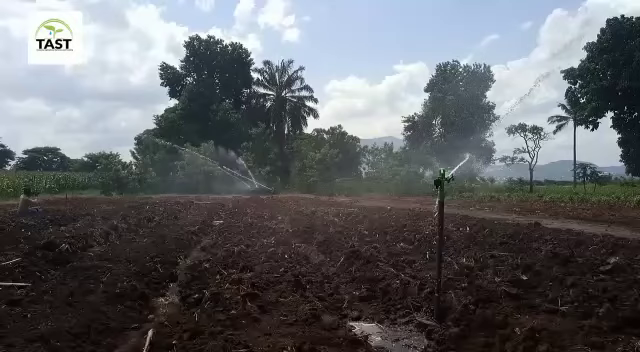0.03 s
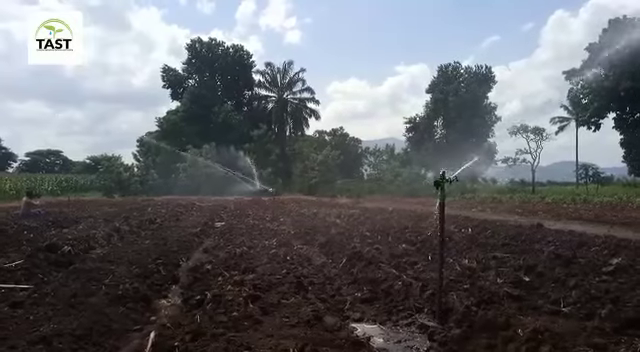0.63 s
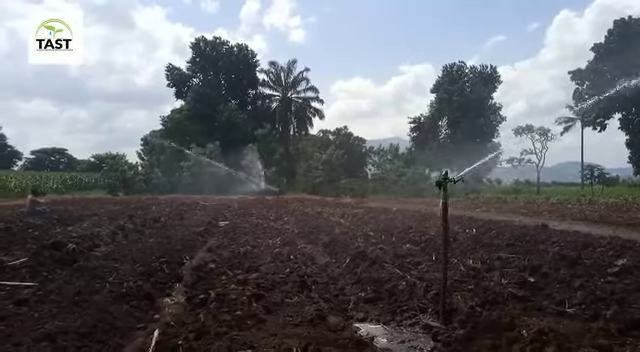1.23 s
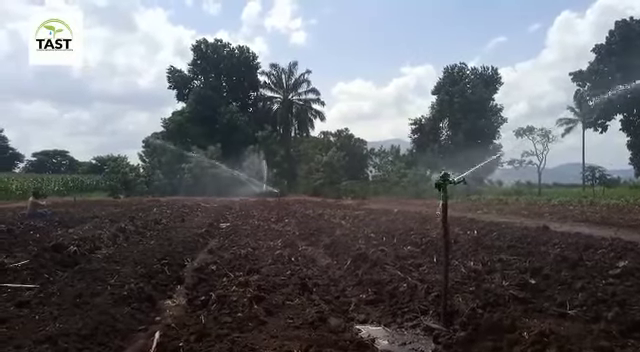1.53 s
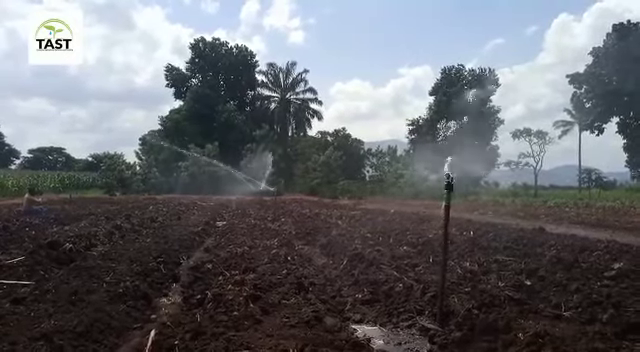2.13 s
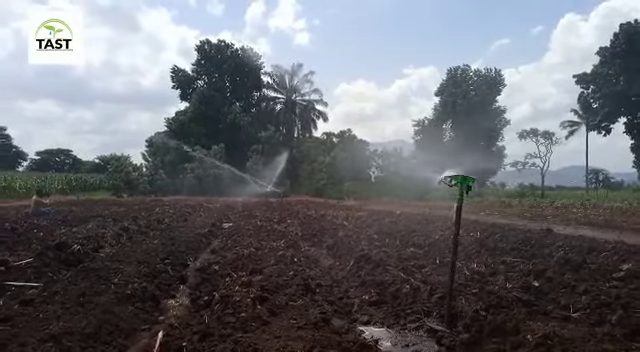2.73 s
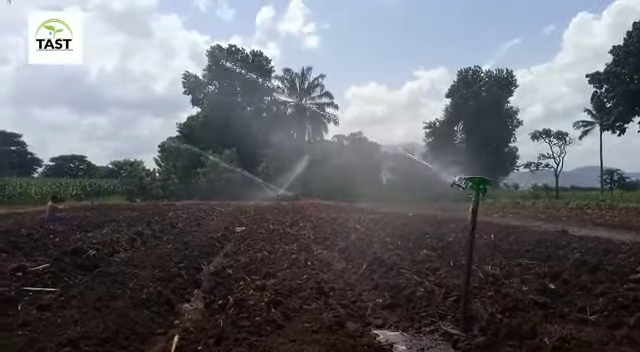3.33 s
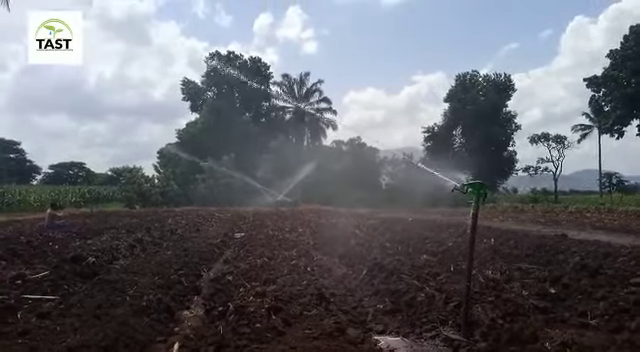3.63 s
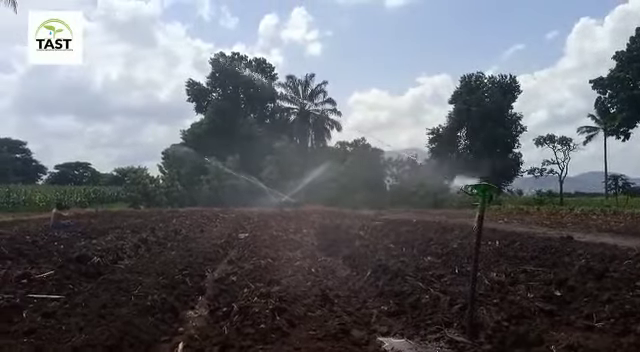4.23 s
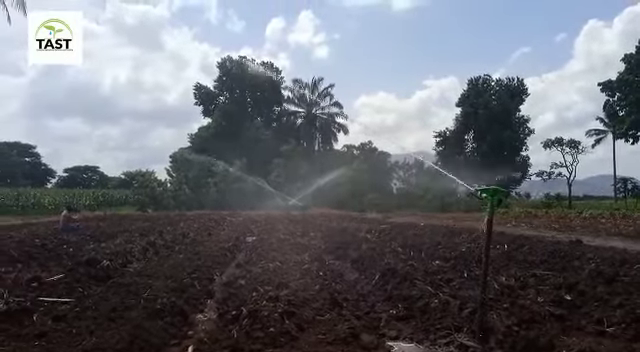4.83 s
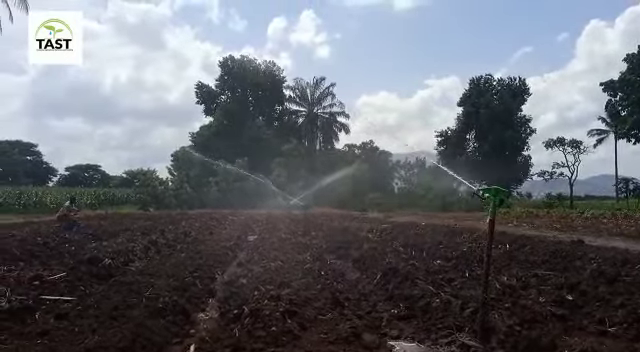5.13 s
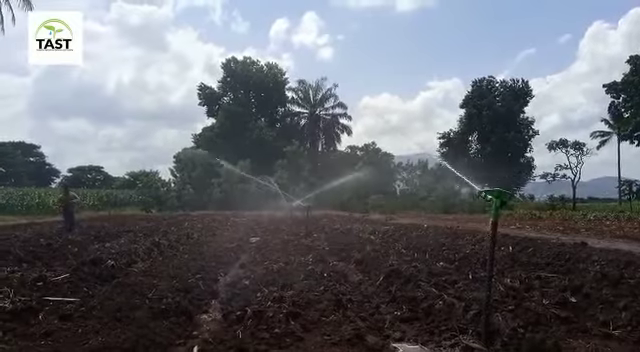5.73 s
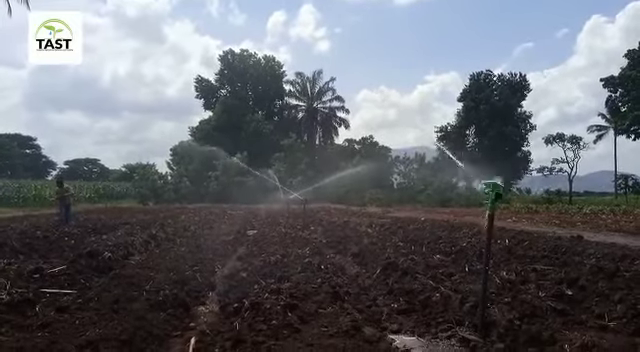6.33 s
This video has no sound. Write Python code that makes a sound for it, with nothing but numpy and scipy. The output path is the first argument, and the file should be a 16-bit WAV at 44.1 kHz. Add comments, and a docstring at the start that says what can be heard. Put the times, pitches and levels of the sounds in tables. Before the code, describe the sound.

An impact sprinkler chops out quick wet bursts of spray, rattles rapidly in reverse, then resumes its even chopping over hissing water.

```python
"""Wet chops of spray, about ten a second, swell in: an impact sprinkler in a ploughed field, a few metres
away, its sprung arm slapping into the jet. It trips into reverse and rattles back, the arm knocking
on its stop about 24 times a second and ringing the plastic head, then steps forward again.
The jet hisses, stray water splashes and ticks, and the soil scatters a short echo.
A far pump drones under a faint wind."""
import sys
import numpy as np
from scipy import signal
from scipy.fft import rfft, irfft, next_fast_len
from scipy.io import wavfile
from scipy.ndimage import uniform_filter1d

SR = 44100
rng = np.random.default_rng(int(sys.argv[2]) if len(sys.argv) > 2 else 0)


def put_to_file(sound):
    """Save the sound as 16-bit audio at rate SR, in the file named by the first command-line argument."""
    columns = np.atleast_2d(sound).T  # one column per channel
    safe = np.clip(columns, -1, 1)
    whole_steps = np.round(safe * 32767)
    wavfile.write(sys.argv[1], SR, whole_steps.astype(np.int16))


N = 285327

# runs of even swings: first beat/s, last beat/s, count, first lag/s
SWING_RUNS = [(.154, 1.207, 12, 0), (1.299, 1.671, 5, -.005), (3.2495, 5.39, 23, .0175),
              (5.466, 6.432, 11, -.003)]
def swing_times(settle_swings=1.9):
    """The sprung arm beats evenly; after an upset it falls back into step within a few swings."""
    return np.concatenate([np.linspace(first, last, count) + lag * np.exp(-np.arange(count) / settle_swings)
                           for first, last, count, lag in SWING_RUNS])


# scattered spray: f/Hz, density/dB
SPRAY_SPECTRUM = [(300, -18.5), (700, -9), (1300, -12.5), (1900, -14.5), (2500, -8), (3300, -5.5),
                  (4050, -4.5), (4900, 1.5), (6500, 3), (7300, -4.5), (8800, -0.5), (11000, -6),
                  (16000, -6.5)]
# spoon hitting water: f/Hz, density/dB
SLAP_SPECTRUM = [(200, -33.5), (450, -6), (620, 3.5), (800, 5.5), (1000, -20), (1250, 4), (1900, -14.5),
                 (3300, -1), (6000, -30.5)]
# swing force: t/s, relative spray level/dB, relative slap level/dB
SWING_FORCE = [(.155, -52.5, -70), (.25, -41.5, -62), (.44, -37, -54), (.75, -35.5, -53), (1.4, -38, -53),
               (3.3, -36, -53.5), (4.3, -37, -50), (5.5, -36.5, -52), (6.43, -37, -57.5)]
def forward_swings(thud_db, thud_delay_s, spray_delay_s, churn_db, spray_trim_db=-1):
    """The arm's spoon thuds into the jet, churns and scatters it; the hollow head rings along."""
    spray_vary_db, slap_vary_db = 0.55, 1.16
    hollow_hz, hollow_width_hz, hollow_db = 3320, 240, -16
    times = swing_times()
    wet_times = times + spray_delay_s
    vary_db = rng.standard_normal((len(times), 2)) * [spray_vary_db, slap_vary_db]
    spray_db, slap_db = at_times(SWING_FORCE, times) + vary_db.T
    spray = water(SPRAY_SPECTRUM, drops_per_s=4000, drop_share=0.65, size_db=5, flutter_db=2)
    spray *= bursts(wet_times, spray_db + spray_trim_db, attack_s=0.002, hold_s=0.01, release_s=0.0035)
    churn = bursts(wet_times, slap_db + churn_db, attack_s=0.0012, hold_s=0.014, release_s=0.012)
    slap = churn * noise(SLAP_SPECTRUM)
    thud = colour(signal.unit_impulse(1024), SLAP_SPECTRUM)
    for at, db in zip(times, slap_db):
        add(slap, at + thud_delay_s, from_db(db + thud_db) * thud / np.abs(thud).max())
    hollow = signal.lfilter(*signal.iirpeak(hollow_hz, hollow_hz / hollow_width_hz, fs=SR), spray + slap)
    return spray + slap + from_db(hollow_db) * np.std(spray) * rms_one(hollow)


# return pace, even between rows: knock number, t/s
RETURN_PACE = [(0, 1.7206), (1, 1.7735), (2, 1.817), (11, 2.1815), (16, 2.391), (31, 3.022), (34, 3.151)]
# return force: t/s, relative knock level/dB, ring f/Hz, brightness/dB, spray level/dB
RETURN_FORCE = [(1.72, -25.5, 3270, -3, -47), (1.77, -24, 3400, -3, -59), (1.82, -28.5, 3560, -5, -38),
                (2.18, -26.5, 3500, -12, -39.2), (2.4, -24, 3420, -12, -40),
                (2.75, -21.5, 3440, -16, -37.5), (3.06, -20, 3670, -4.5, -36), (3.15, -24.5, 3500, 4, -38)]
# plastic arm and head modes: f/ring f, level/dB, t60/s, share of brightness
HEAD_MODES = [(.9, -20, .011, 0), (.99, -2, .007, 0), (1.14, -8, .005, .2), (1.44, -2, .0035, 1),
              (1.66, -5, .003, 1), (1.88, -5, .003, 1), (2.6, -9, .002, 1), (4.35, -11, .002, 1)]
# a small part radiates little below its first mode: f/Hz, gain/dB
RADIATION = [(1500, -22), (2500, -18), (2750, -10), (3050, 0), (16000, 0)]
def return_run(vary_db, limp_s=0.001, limp_db=0.9, limp_hz=25, spray_lead_s=0.014):
    """On a short stroke the arm cuts the jet, then hits the stop, which rings the head."""
    number = np.arange(RETURN_PACE[-1][0] + 1)
    limp = (-1) ** number  # every other knock is later, harder and higher
    times = at_times(RETURN_PACE, number)[0] + limp_s * limp
    knock_db, ring_hz, bright_db, spray_db = at_times(RETURN_FORCE, times)
    knock_db += limp_db * limp
    ring_hz += limp_hz * limp
    spray = water(SPRAY_SPECTRUM, drops_per_s=2500, drop_share=0.36, size_db=4.5, flutter_db=2.5)
    spray *= bursts(times - spray_lead_s, spray_db, attack_s=0.0032, hold_s=0.0094, release_s=0.0027)
    knocks = np.zeros(N)
    for at, db, hz, bright in zip(times, knock_db, ring_hz, bright_db):
        for ratio, mode_db, t60_s, share in HEAD_MODES:
            level_db = db + mode_db + share * bright + vary_db * rng.standard_normal()
            add(knocks, at, from_db(level_db) * ring(ratio * hz, t60_s))
    return colour(knocks, RADIATION) + spray


# loudest stray ticks: t/s, peak before trim/dB, f/Hz, t60/s
LOUD_TICKS = [(.7329, -17.5, 8300, .0025), (1.3701, -18.5, 6860, 0.0061), (1.396, -21, 4970, .005),
              (1.4202, -17.5, 6660, 0.005), (1.4906, -22.5, 5700, .0068), (1.523, -19.5, 5250, 0.007),
              (1.5605, -17.5, 5000, 0.0056), (1.5795, -18.5, 6700, 0.0026), (1.617, -22, 6230, 0.0034),
              (1.644, -20.5, 6700, .005), (1.8445, -24, 5030, .007), (2.2064, -20, 5870, 0.0043),
              (2.87, -18, 5240, 0.0058), (2.927, -18, 6500, 0.0085), (3.1783, -22, 5730, 0.0041),
              (3.9186, -19.5, 6100, .014), (4.0086, -24, 6600, .0079), (4.3998, -20.5, 6030, 0.0037),
              (6.0038, -16, 6400, 0.018), (6.0918, -21, 6540, .0048)]
def ticks(lesser_rows, crack_db, crack_t60_s, trim_db=-1):
    """Each tick, loud or lesser, is a tiny crack and a brief ring."""
    out = np.zeros(N)
    for at, db, hz, t60_s in list(LOUD_TICKS) + lesser_rows:
        tone = ring(hz, t60_s)
        t = np.arange(len(tone)) / SR
        crack = noise(SPRAY_SPECTRUM, len(t)) * from_db(-60 * t / crack_t60_s)
        tick = tone + from_db(crack_db) * crack
        add(out, at, from_db(db + trim_db) * tick / np.abs(tick).max())
    return out


def lesser_ticks(times, levels_db, centre_hz=5950, spread_octaves=0.23, t60_s=0.0063):
    """Tick rows with one decay time and scattered pitches."""
    pitches_hz = centre_hz * 2 ** (spread_octaves * rng.standard_normal(len(times)))
    return [(at, db, hz, t60_s) for at, db, hz in zip(times, levels_db, pitches_hz)]


# arm ticks, strongest early on: t/s, relative peak/dB
ARM_TICK_LEVEL = [(.155, -51), (.25, -27), (.54, -20), (.75, -23), (1.02, -24.5), (1.2, -28), (3.3, -39)]
def arm_ticks(delay_s=0.004):
    """The arm ticks as it swings in; returns tick rows."""
    times = swing_times()
    return lesser_ticks(times + delay_s, at_times(ARM_TICK_LEVEL, times)[0])


def stray_drops(count, start_s=0.462, over_jet_db=14, vary_db=1):
    """Drops land at random, their level following the jet; returns tick rows."""
    times = rng.uniform(start_s, N / SR, count)
    levels_db = at_times(JET_LEVEL, times)[0] + over_jet_db + vary_db * rng.standard_normal(count)
    return lesser_ticks(times, levels_db)


# stray gushes: t/s, length/s, level before trim/dB
SPLASHES = [(1.063, 0.029, -46.5), (1.137, 0.0083, -46.5), (1.307, 0.019, -36), (1.359, .023, -36.5),
            (1.51, 0.012, -38.5), (1.562, 0.016, -37.5), (1.77, 0.0108, -35.5), (2.204, .0092, -38),
            (2.868, 0.0075, -32.5), (3.173, .016, -39.5), (3.958, 0.028, -45.5), (4.396, 0.0065, -48),
            (6, 0.016, -56)]
def splashes(edge_s, splat_db, trim_db=1):
    """Coarse gushes thrown off the sprinkler, each with a dull splat under it."""
    gate = np.zeros(N)
    for at, length_s, db in SPLASHES:
        add(gate, at, np.full(round(length_s * SR), from_db(db + trim_db)))
    gate = uniform_filter1d(gate, round(edge_s * SR))
    splat = from_db(splat_db) * noise(SLAP_SPECTRUM)
    gush = water(HISS_SPECTRUM, drops_per_s=2500, drop_share=0.58, size_db=9, flutter_db=2.5)
    return gate * (gush + splat)


# hiss of jet and gushes: f/Hz, density/dB
HISS_SPECTRUM = [(400, -9.5), (1200, -9.5), (2300, -7.5), (3300, 2), (3900, -4), (4900, 3), (6500, 4.5),
                 (7300, -4.5), (8900, 0.5), (11000, -7), (16000, -4.5)]
# unbroken jet: t/s, level before trim/dB
JET_LEVEL = [(.4, -53.5), (1.05, -49.5), (1.48, -47.5), (1.62, -40), (1.73, -49.5), (1.85, -43),
             (2.1, -48.5), (2.3, -42.5), (2.6, -47), (3.13, -45.5), (3.23, -52), (5.9, -53), (6.06, -48.5),
             (6.25, -53.5)]
def jet(trim_db=-0.5, waver_db=1):
    """The free jet hisses and its drops patter on the soil."""
    hiss = water(HISS_SPECTRUM, drops_per_s=900, drop_share=0.27, size_db=6, flutter_db=2)
    level_db = at_times(JET_LEVEL, np.arange(N) / SR)[0]
    return from_db(level_db + trim_db + waver_db * drift(21)) * hiss


# wind rumble: f/Hz, density/dB
WIND_SPECTRUM = [(15, -48), (35, -14), (70, -2.5), (130, 1.5), (200, -6), (300, -13.5), (700, -16.5),
                 (1000, -18.5), (2000, -23.5), (5000, -39)]
def wind(level_db, gust_db):
    """Faint wind rumbles in soft gusts."""
    return from_db(level_db + gust_db * drift(3.8)) * noise(WIND_SPECTRUM)


# pump lines: f/Hz, rms before trim/dB, waver/Hz
PUMP_LINES = [(50.3, -66, 0.33), (52.2, -60.5, 0.47), (100.4, -59.5, 0.76), (117.6, -61.5, 2.58),
              (142, -66.5, 2.98)]
def pump(trim_db=-2.5, waver_db=1.8):
    """A far pump drones in low lines that waver in pitch and level."""
    out = np.zeros(N)
    for hz, db, waver_hz in PUMP_LINES:
        phase = 2 * np.pi * np.cumsum(hz + waver_hz * drift(3)) / SR
        out += np.sqrt(2) * from_db(db + trim_db + waver_db * drift(2.7)) * np.sin(phase)
    return out


def diffuse_echo(x, level_db, t60_s, delay_s):
    """A short diffuse echo: a scatter of fine reflections that dies away quickly."""
    t = np.arange(SR // 10) / SR
    echo = rng.standard_normal(len(t)) * from_db(-60 * t / t60_s) * (t > delay_s)
    return from_db(level_db) * signal.fftconvolve(x, echo / np.linalg.norm(echo))[:N]


def water(spectrum, drops_per_s, drop_share, size_db, flutter_db, patchy_db=1.5):
    """Water tearing apart: fine mist plus droplets of uneven size; rms 1."""
    sizes = from_db(size_db * np.minimum(rng.exponential(1, N), 3)) * rng.choice([-1, 1], N)
    droplets = rms_one(sizes * (rng.random(N) < drops_per_s / SR))
    spray = np.sqrt(drop_share) * droplets + np.sqrt(1 - drop_share) * rng.standard_normal(N)
    # the mix of drop sizes keeps changing, so the bands swell and sink separately
    edges_hz = np.geomspace(2000, 16000, 8)
    out = spray.copy()
    for low, high in zip(edges_hz, edges_hz[1:]):
        band = signal.sosfilt(signal.butter(1, [low, high], "band", fs=SR, output="sos"), spray)
        out += band * (from_db(patchy_db * drift(115)) - 1)
    return rms_one(colour(out * from_db(flutter_db * drift(170)), spectrum))


def bursts(times, levels_db, attack_s, hold_s, release_s, mist_db=-13, mist_s=0.016):
    """Envelope of spray bursts: swell, hold, then a release with mist hanging on."""
    lead_s, mist = 0.03, from_db(mist_db)
    t = np.arange(-lead_s, 2 * lead_s, 1 / SR)
    after_s = np.maximum(t - hold_s, 0)
    swell = np.exp(np.minimum(t, 0) / attack_s)
    release = (1 - mist) * np.exp(-after_s / release_s) + mist * np.exp(-after_s / mist_s)
    out = np.zeros(N)
    for at, db in zip(times, levels_db):
        add(out, at - lead_s, from_db(db) * swell * release)
    return out


def ring(hz, t60_s):
    """A struck mode, 30 ms long."""
    t = np.arange(round(0.03 * SR)) / SR
    return np.sin(2 * np.pi * hz * t) * from_db(-60 * t / t60_s)


def drift(rate_hz):
    """Smooth random curve, rms 1, changing at about rate_hz."""
    hop, warm_up = 40, 2000
    pole = np.exp(-2 * np.pi * hop * rate_hz / SR)
    white = rng.standard_normal(N // hop + warm_up + 2)
    slow = signal.lfilter([1], [1, -2 * pole, pole * pole], white)[warm_up:]
    return np.interp(np.arange(N) / hop, np.arange(len(slow)), rms_one(slow))


def colour(x, spectrum):
    """Minimum-phase filter from rows of f/Hz, gain/dB."""
    size = 2 * next_fast_len(len(x))
    hz, db = np.transpose(spectrum)
    bins_hz = np.arange(size // 2 + 1) * SR / size
    log_gain = np.log(from_db(np.interp(np.log(bins_hz + 1), np.log(hz), db)))
    cepstrum = irfft(log_gain)[:size // 2]
    cepstrum[1:] *= 2
    return irfft(rfft(x, size) * np.exp(rfft(cepstrum, size)))[:len(x)]


def noise(spectrum, samples=N):
    """Coloured noise, rms 1."""
    return rms_one(colour(rng.standard_normal(samples), spectrum))


def high_pass(x, hz, order):
    return signal.sosfilt(signal.butter(order, hz, "high", fs=SR, output="sos"), x)


def at_times(rows, times):
    """Interpolate each later column along the first."""
    knots, *columns = np.transpose(rows)
    return [np.interp(times, knots, column) for column in columns]


def add(out, at_s, sound):
    """Mix a short sound in."""
    start = max(round(at_s * SR), 0)
    part = out[start:start + len(sound)]
    part += sound[:len(part)]


def from_db(db):
    return 10 ** (np.asarray(db) / 20)


def rms_one(x):
    return x / np.sqrt(np.mean(x ** 2) + 1e-20)


def scene():
    """The sprinkler over jet, wind and pump, which fade in; mono but for the treble of the gushes."""
    fade_start_s, fade_s, fade_power = 0.132, 0.33, 0.81
    gushes = splashes(edge_s=0.0011, splat_db=-23)
    ticking = ticks(arm_ticks() + stray_drops(count=50), crack_db=-7.5, crack_t60_s=0.0058)
    ticking = high_pass(ticking, hz=3160, order=2)
    chops = forward_swings(thud_db=13, thud_delay_s=0.003, spray_delay_s=0.00074, churn_db=-8)
    sprinkler = chops + return_run(vary_db=2) + ticking + gushes
    fade = np.clip((np.arange(N) / SR - fade_start_s) / fade_s, 0, 1) ** fade_power
    background = fade * (jet() + wind(level_db=-54, gust_db=1.2) + pump())
    mid = sprinkler + diffuse_echo(sprinkler, level_db=-9.5, t60_s=0.038, delay_s=0.0018) + background
    gush_echo = diffuse_echo(gushes, level_db=-12, t60_s=0.006, delay_s=0.0005)
    side = high_pass(gush_echo, hz=5300, order=12)
    return np.array([mid + side, mid - side])


# microphone response, a dip and a peak in the top octave: f/Hz, gain/dB
MICROPHONE = [(10000, 0.5), (12700, 1), (13700, -4), (14200, -2.5), (14700, 7.5), (15700, 4.5)]
def record(dry):
    """Microphone colour, then a steep top cut."""
    cutoff_hz = 15900
    top_cut = signal.ellip(12, 0.1, 80, cutoff_hz, fs=SR, output="sos")
    return signal.sosfilt(top_cut, [colour(channel, MICROPHONE) for channel in dry])


dry = scene()
out = record(dry)
put_to_file(out)
```